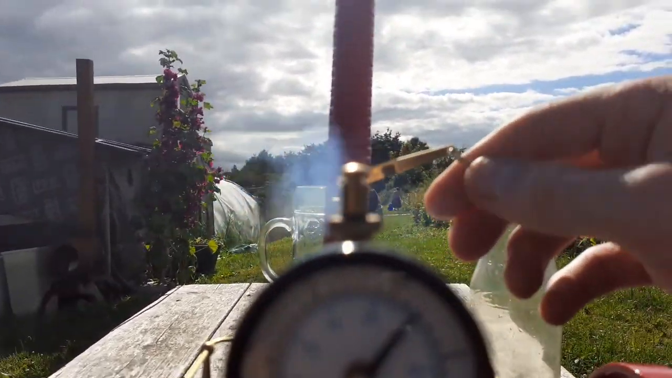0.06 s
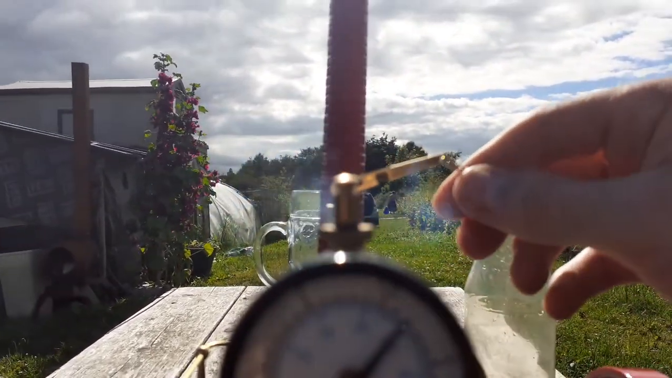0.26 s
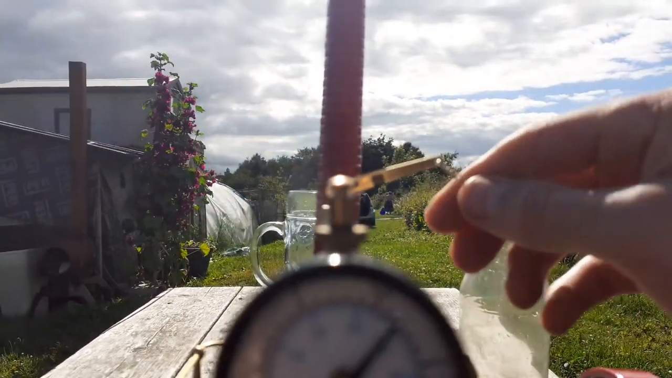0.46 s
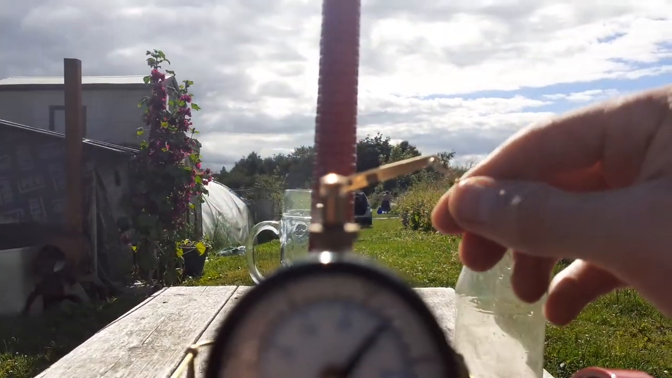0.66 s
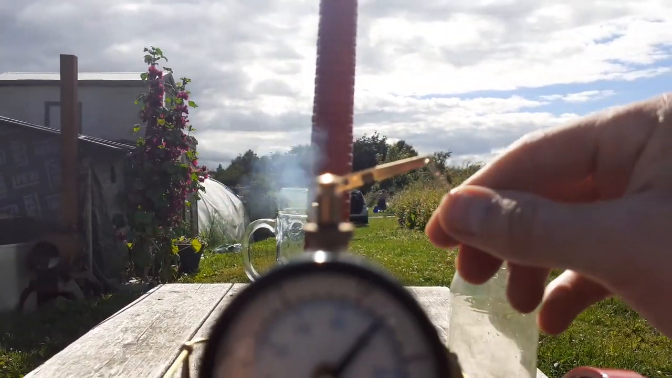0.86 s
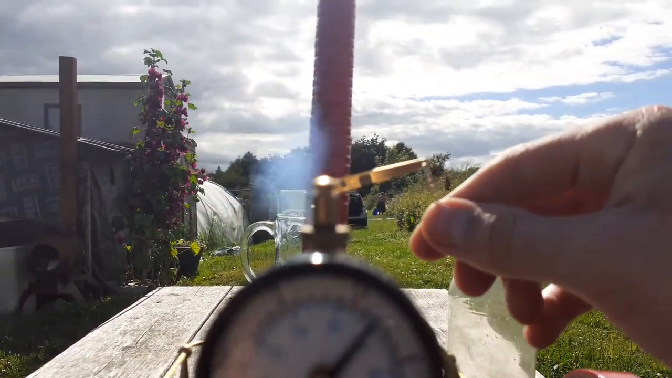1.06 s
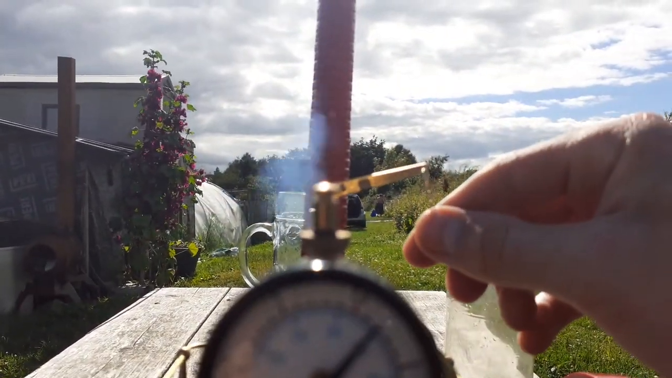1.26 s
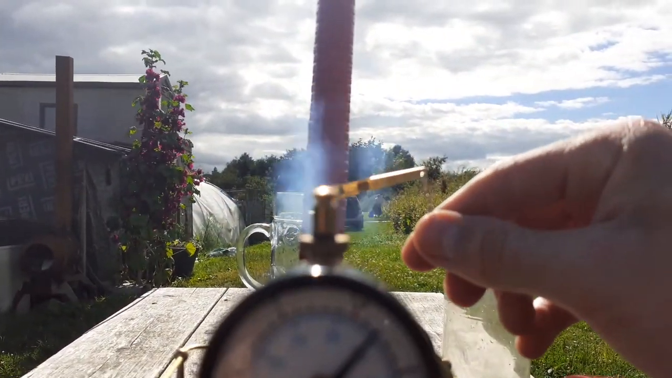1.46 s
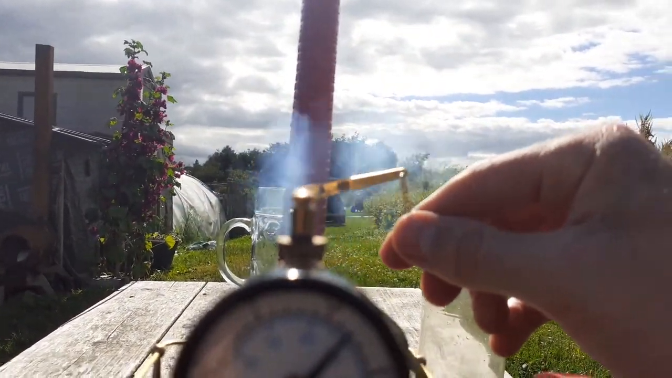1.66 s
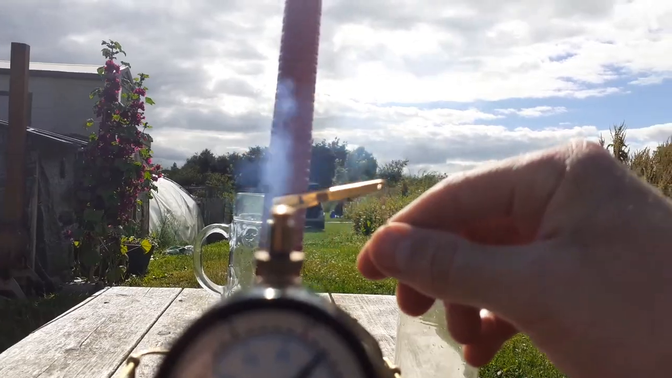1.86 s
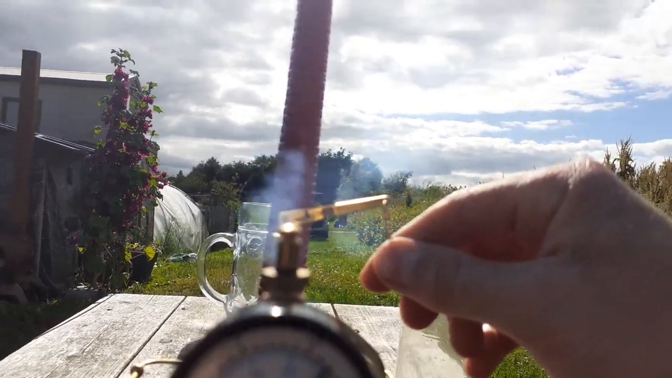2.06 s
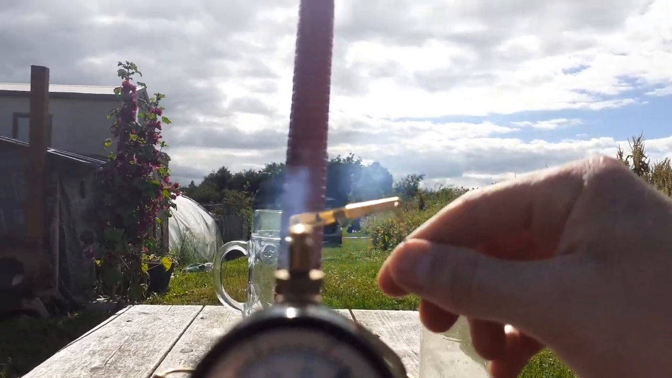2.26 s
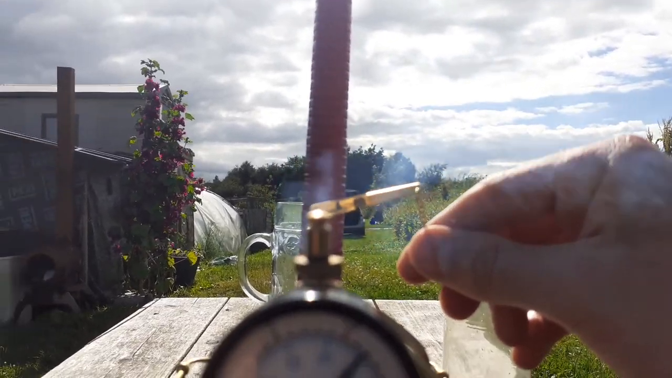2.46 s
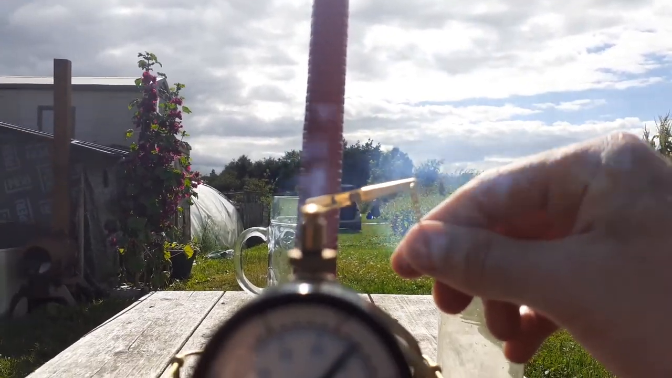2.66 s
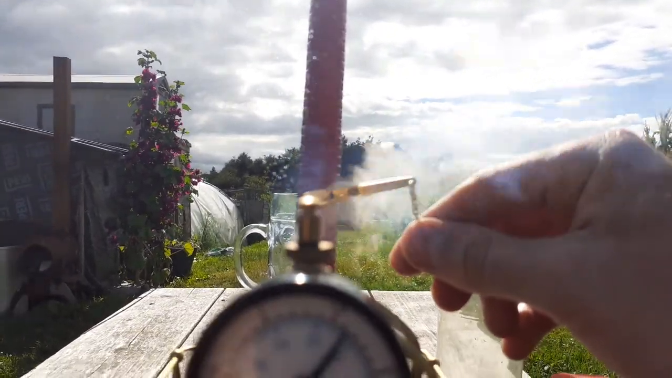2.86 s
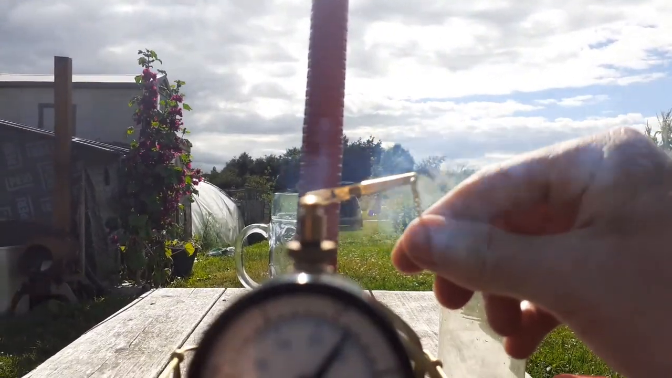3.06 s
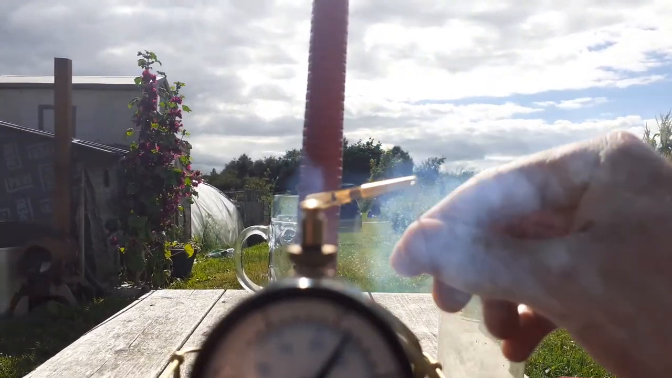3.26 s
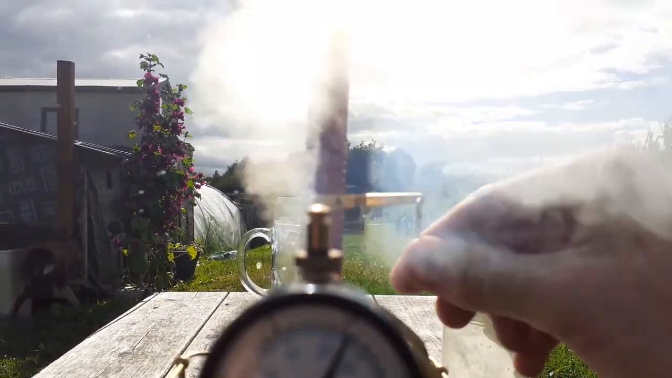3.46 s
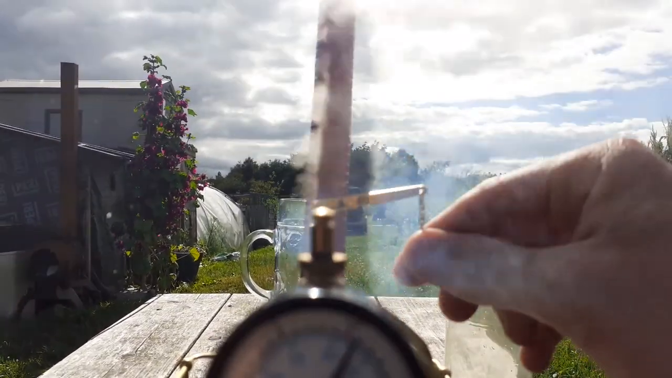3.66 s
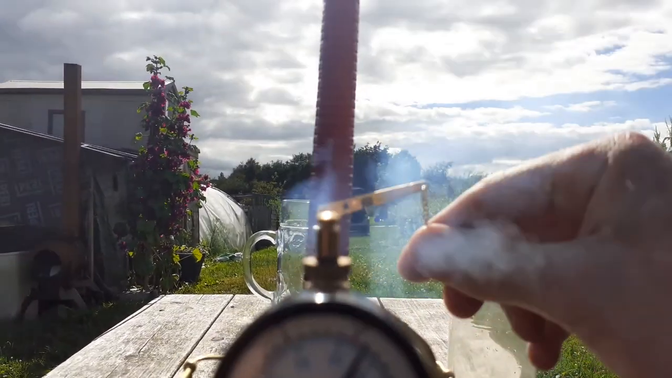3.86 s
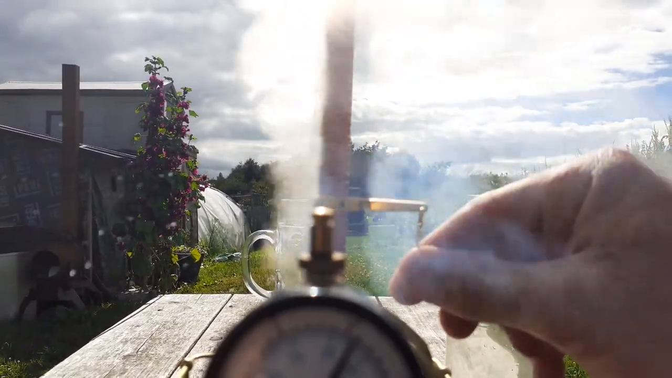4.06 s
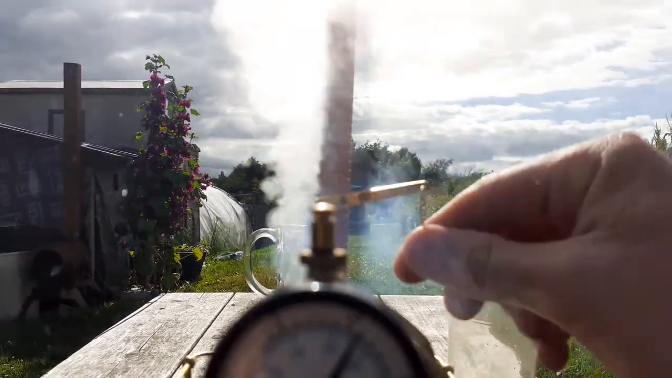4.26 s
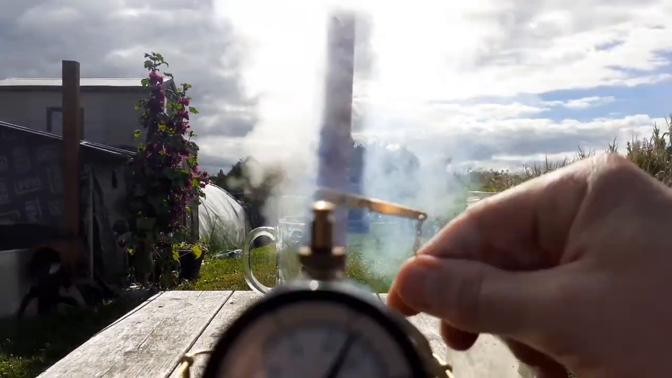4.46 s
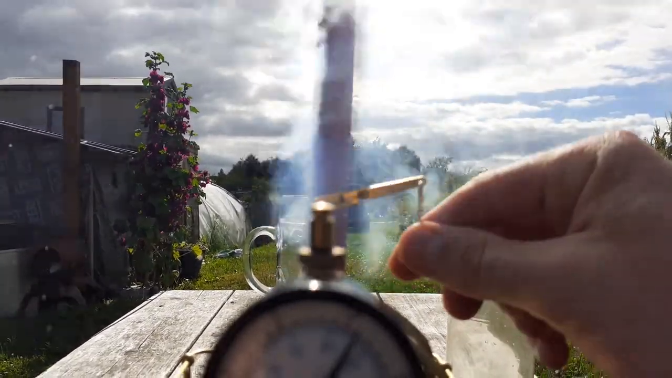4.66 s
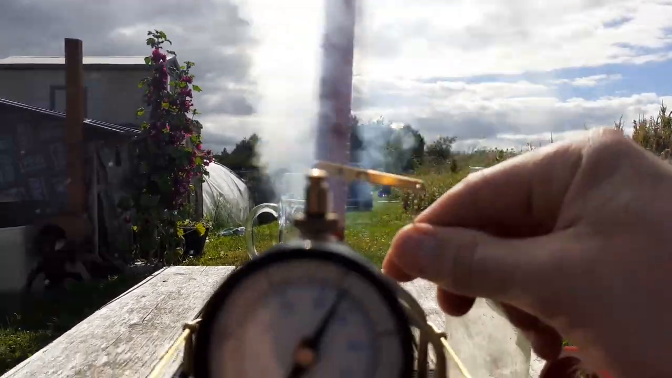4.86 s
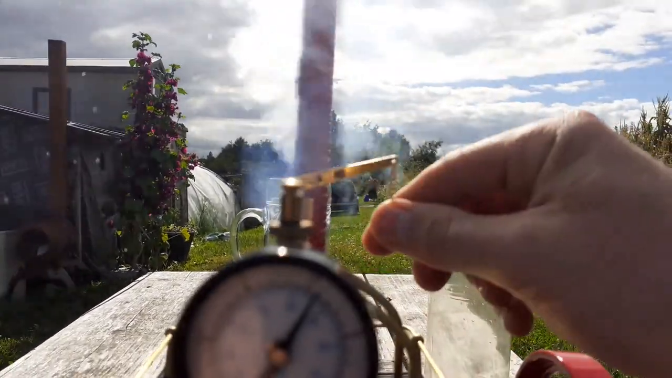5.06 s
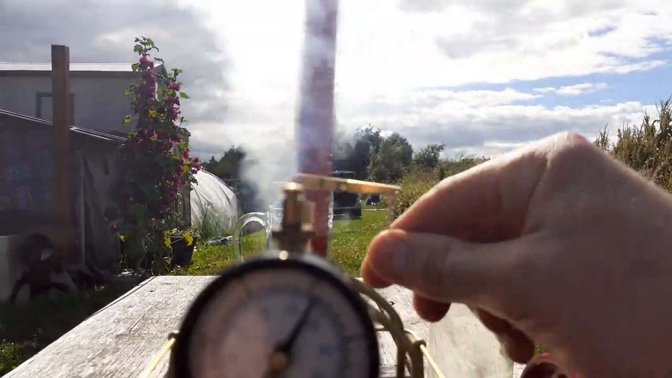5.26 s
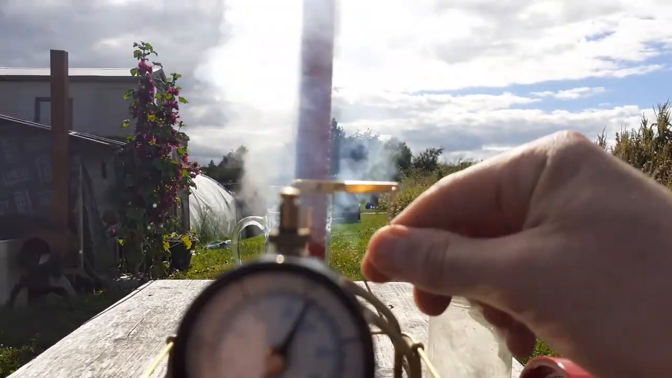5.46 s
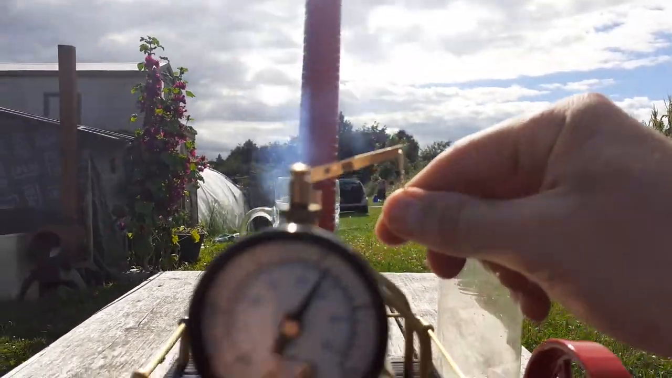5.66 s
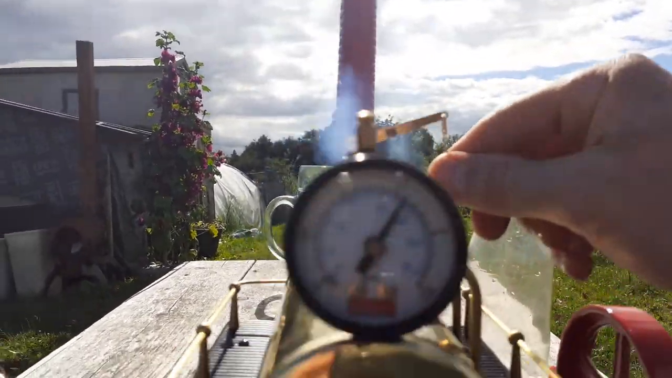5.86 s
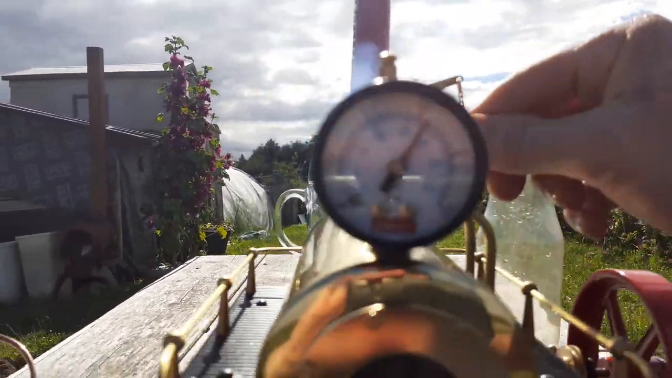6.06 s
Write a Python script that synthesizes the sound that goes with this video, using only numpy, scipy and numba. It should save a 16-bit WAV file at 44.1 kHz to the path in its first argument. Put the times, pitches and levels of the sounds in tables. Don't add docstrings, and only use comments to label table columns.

```python
import sys
import numpy as np
from scipy import signal
from scipy.fft import rfft, irfft
from scipy.io import wavfile
from scipy.ndimage import uniform_filter1d
from numba import njit

SR = 44100
rng = np.random.default_rng(int(sys.argv[2]) if len(sys.argv) > 2 else 0)


def makeup_ratio(level_db):
    decades = np.asarray(level_db, float) / 20
    return 10 ** decades


def unload_audio(sound):
    columns = np.transpose(np.atleast_2d(sound))
    steps = np.round(np.clip(columns, -1, 1) * 32767)
    wavfile.write(sys.argv[1], SR, steps.astype(np.int16))


N = 269892
T = np.arange(N) / SR
HZ = np.maximum(np.fft.rfftfreq(N, 1 / SR), 1)

# start_s, stop_s, pitch_hz, level_db, left_minus_right_db
TOOTS = [
    (3.431, 3.737, 4157, -14, 8),
    (4.035, 4.333, 4310, -12, 6),
    (4.465, 4.687, 4342, -12, 6.5),
    (4.772, 5.108, 4385, -12, 5),
    (5.263, 5.598, 4351, -15.5, 8.5),
]
# pull_ms, release_ms, level_drift_db, pitch_drift_hz, left_swing_db
LEVER = [
    (24.1, 27, -1.5, 5.5, -3),
    (22.7, 20, -0.5, -70.5, -1),
    (12.18, 12, -0.8, -26.5, 3),
    (12.12, 18, 0, 12.5, 2),
    (10.11, 13.9, -1, 8.5, 3),
]
# centre_s, bend_hz, half_length_ms
SURGES = [
    (3.445, -120, 4.2),
    (4.13, 29.5, 22),
    (4.855, 75.5, 18.3),
    (4.915, -44.5, 22),
]
# centre_s, depth_db, half_length_ms
SHADES = [
    (4.577, 5, 48),
    (4.93, 3, 45),
    (5.44, 1.5, 70),
]
# pitch_hz, second_db, third_db
OVERTONES = [(3600, -31, -33), (4000, -27, -22), (4150, -27, -18.5), (4300, -31, -23), (4450, -32, -27)]


def whistle():
    speaks_hz, dies_db = 3072, 29
    tone_law = 1.22
    start, stop, full_hz, db, pan_db = nearest(TOOTS)
    drift_db, drift_hz, swing_db = nearest(LEVER)[2:]
    weak_start_db = nearest(STEAM)[3]
    rising, falling, place = valve(1)
    rising, falling = np.minimum(rising, 1), np.minimum(falling, 1)
    drift = place - .5

    hz = full_hz + drift_hz * drift - (full_hz - speaks_hz) * (rising + falling)
    hz = hz + sum(bend * np.exp(-((T - s) * 1000 / ms) ** 2) for s, bend, ms in SURGES)
    hz = hz - 4 * choke()
    flutter_hz = 14 * walk(400) + 9 * walk(60)
    phase = 2 * np.pi * np.cumsum(hz + flutter_hz) / SR

    db = db - weak_start_db * rising ** tone_law - dies_db * falling ** tone_law
    db = db + drift_db * drift - 0.54 * dips(SHADES) - choke()
    db = db + .6 * walk(500) + .35 * walk(90)
    pan_db = pan_db + swing_db * drift - dips(SHADES)
    on = uniform_filter1d(1. * (T > start) * (T < stop), size=130)

    pitch, second_db, third_db = np.transpose(OVERTONES)
    second = makeup_ratio(np.interp(hz, pitch, second_db))
    third = makeup_ratio(np.interp(hz, pitch, third_db) + 2 * walk(170))
    out = []
    for side, lag in ((1, 0), (-1, 1.5 + .1 * walk(25))):
        p = phase - lag
        tone = np.sin(p) + second * np.sin(2 * p) + third * np.sin(3 * p)
        port_db = db + 5.5 + side * pan_db / 2 + (.7 - .3 * side) * walk(400)
        out.append(on * makeup_ratio(port_db) * tone)
    return np.array(out)


# centre_s, depth_db, half_length_ms
DROPS = [
    (3.43, 7, 6.7),
    (3.455, 10, 2.7),
    (3.507, 3, 2.1),
    (3.681, 5.5, 0.91),
    (4.606, 6, 1.8),
    (4.861, 5, 1.9),
    (4.902, 11.5, 2.7),
    (4.916, 3.5, 2.3),
    (5.343, 4, 0.93),
    (5.382, 17, 2.8),
]
# centre_s, depth_db, half_length_ms
BIG_DROP = (4.1722, 34, 5.2)


def choke():
    return dips(DROPS + [BIG_DROP])


def valve(slow):
    start, stop = nearest(TOOTS)[:2]
    pull_ms, release_ms = nearest(LEVER)[:2]

    def missing(seconds, ms):
        return np.exp(np.minimum(seconds * 1000 / (slow * ms), 4))

    place = np.clip((T - start) / (stop - start), 0, 1)
    return missing(start - T, pull_ms), missing(T - stop, release_ms), place


# jet_db, buffeting_db, drift_db, weak_start_db
STEAM = [
    (-40.5, -45.5, -1, 2.5),
    (-40, -39, -1.5, 23),
    (-40, -35, -1.5, 30),
    (-40, -39, -1.5, 29),
    (-40, -39, -0.5, 25.5),
]


def flow(col, edge_db, slow):
    rising, falling, place = valve(slow)
    steam = nearest(STEAM)
    return makeup_ratio(steam[col] + steam[2] * (place - .5) - edge_db * (rising + falling))


# time_s, jet_db, breath_above_jet_db
SPURT = [
    (2.835, -65, 11),
    (2.856, -29, 10.5),
    (2.878, -28.5, 10),
    (2.895, -33, 3.5),
    (3.04, -39, 10.5),
    (3.09, -44.5, -2),
    (3.375, -46, 4.5),
    (3.428, -30, 2),
    (3.48, -42.5, 6),
]
# freq_hz, density_db
JET = [(300, -25.5), (600, -23.5), (2000, -18), (3500, -6), (5000, -2), (5900, -10), (7500, -3),
       (9100, -17.5), (10500, -8.5), (12300, 0), (14000, -1.5), (16000, -2.5)]
# freq_hz, lead_rad
JET_LEAD = [(300, .2), (2000, .8), (4800, 1.7), (5500, 2.4), (6900, 4.8), (8300, 5.1), (11000, 6.9),
            (16000, 10.2)]
# freq_hz, left_minus_right_db
JET_BALANCE = [(400, 12), (1300, 14), (2400, 12.5), (4400, 1.5), (8100, -1.5), (12000, 7), (15000, 8)]


def jet():
    wet, slug = T < TOOTS[0][0], T < 2.885
    bore = np.sin(np.pi * valve(1)[2])
    lead, balance_db = along(JET_LEAD), along(JET_BALANCE)

    rush = flicker(ports(coloured(JET, 13660, 15040), 0.75, lead, balance_db), 0, 1.6, 60)
    top = signal.sosfiltfilt(signal.butter(4, 13200, "high", fs=SR, output="sos"), rush)
    rush = rush - np.where(wet, .55, -0.34) * top

    wet_hz = np.maximum(4600 - 1700 * (T - 2.885), 4320)
    hz = uniform_filter1d(np.select([slug, wet], [3740, wet_hz], 4490.), size=600)
    hz = hz - 28.5 * choke()
    width_hz = uniform_filter1d(np.select([slug, wet], [1400, 330], 750.), size=600)
    below_breath_edge = 1 / (1 + (HZ / 5300) ** 12)
    noise = rfft(rng.standard_normal((2, N)))
    air = irfft(below_breath_edge * ports(noise, 0.96, lead, balance_db), N)
    breath = np.array([svf(svf(a, hz, width_hz), hz, 3 * width_hz) for a in air]) / np.sqrt(width_hz)
    breath_db = np.where(wet, curve(SPURT, 2), 7.5 + 2.5 * bore)
    breath_db = breath_db + 2.0 * walk(150) + 0.07 * choke()
    breath = breath / np.std(breath) * makeup_ratio(breath_db)

    spurt = makeup_ratio(curve(SPURT, 1, -120))
    toot = flow(col=0, edge_db=8, slow=1.16) * makeup_ratio(1.5 * bore)
    return np.hypot(spurt, toot) * (rush + breath)


# freq_hz, density_db
BUFFET = [(18, -54.5), (30, -10.5), (245, -3), (334, -3), (437, -2.5), (550, -2), (642, -2.5), (3000, -7),
          (3900, -30.5), (6600, -120)]
# centre_s, depth_db, half_length_ms
LULLS = [
    (4.87, 10, 9.7),
    (4.942, 14, 19),
    (5.4, 2, 30),
]
# freq_hz, density_db
BREEZE = [(12, -64), (20, -26), (81, 5), (127, -3), (231, -15.5), (330, -16.5), (464, -38.5), (600, -17.5),
          (780, -43), (1320, -120)]
# time_s, level_db
WIND = [
    (2.16, -70),
    (2.28, -49),
    (2.39, -50.5),
    (2.446, -33.5),
    (2.576, -38),
    (2.62, -47),
    (2.77, -39),
    (3.25, -37),
    (3.55, -67.5),
]


def buffeting():
    steam = flicker(coloured(BUFFET, 230, 1800), 0, 2.2, 40) * makeup_ratio(np.array([[5], [-14]]))
    blowing = flow(col=1, edge_db=38, slow=1.9) * makeup_ratio(-dips(LULLS))
    breeze = flicker(coloured(BREEZE, 40, 200), 0, 2.1, 22.04) * makeup_ratio(np.array([[5], [11.5 - 23.5]]))
    return steam * blowing + breeze * makeup_ratio(curve(WIND, 1, -120) + 2.9 * walk(35))


# freq_hz, width_hz, level_db
SHELL = [(955, 15, -5), (1112, 27, -5), (1303, 42, 8), (1723, 54, 10), (1863, 18, -4.5), (2240, 9.9, -13.5),
         (2430, 68, -16), (2700, 38, -19.5)]
# freq_hz, density_db
CRACK = [(880, -31), (1500, -1), (2980, -7), (4760, -5), (5700, -9), (7160, -3.5), (9180, -23), (15000, -9),
         (16200, -23.5)]


def collapse(t, crack_db, ms):
    rise_ms = 1.5
    hz, width_hz, mode_db = np.array(SHELL).T[:, :, None]
    modes = makeup_ratio(mode_db) * np.exp(-np.pi * 1.6 * width_hz * t) * np.sin(2 * np.pi * hz * t)
    bins = np.fft.rfftfreq(len(t), 1 / SR) + 1
    edge = makeup_ratio(along(CRACK, bins)) * np.minimum(bins / 1500, 1) ** 2
    body = signal.butter(2, [650, 2800], "band", fs=SR, output="sos")

    shared, own, grit, spit, lumps = rng.standard_normal((5, len(t)))
    lumps = uniform_filter1d(np.repeat(lumps[:64], 64), 64)
    later = np.roll(shared, 4)
    start = makeup_ratio(4.05 * lumps) * np.minimum(t * 1000 / rise_ms, 1)
    decay = np.exp(-(t * 1000 / (rise_ms + ms)) ** 1.23)
    burst = start * decay * np.array([shared, 0.82 * later + .5 * own])

    mode_gains = makeup_ratio(4.5 * np.array([own, grit])[:, :len(hz)])
    ring = signal.fftconvolve(burst, mode_gains @ modes, axes=1)[:, :len(t)]
    thud = signal.sosfilt(body, burst)
    crack_noise = irfft(edge * rfft(np.array([grit, spit]) + own), len(t))
    crack = start * np.exp(-t * 1000 / 5.8) * crack_noise
    ring, thud, crack = (v / np.abs(v).max(axis=1, keepdims=True) for v in (ring, thud, crack))
    left = np.array([[.5], [-.5]])
    return makeup_ratio(left * 7.5) * (ring + 0.89 * thud) + makeup_ratio(crack_db - 1.0 - left * 2.5) * crack


# time_s, peak_db, crack_above_ring_db, burst_ms
KNOCKS = [(0.065, -26, 7.5, 14), (0.069, -27.5, 12, 8.9), (0.149, -17, -9, 14), (0.182, -25, -4, 22),
          (0.257, -34.5, 16, 8.6), (0.26, -20, 9, 13), (1.12, -25, -1, 11), (1.186, -22.5, 11.5, 10),
          (1.2, -23.5, 2, 14), (1.721, -26.5, -2, 5.3), (2.286, -25, -19, 11), (2.464, -31.5, -12, 66),
          (2.511, -24, 8, 14), (2.604, -21, -18, 18), (2.627, -21.5, -19, 15), (2.725, -31, 8, 8.9),
          (2.732, -22, 8.5, 12.5), (2.846, -27, 3, 25), (3.18, -35.5, -7, 23), (3.228, -34.5, -3.5, 34),
          (3.655, -32.5, 2, 11), (4.019, -47.5, 13, 14), (4.694, -39.5, 6, 9.1), (5.117, -33.5, -2, 14),
          (5.229, -35.5, 5.5, 12.3)]
# time_s, peak_db
MORE_KNOCKS = [(0.013, -34.5), (0.112, -32.5), (0.243, -32), (0.351, -35), (0.375, -34.5), (0.626, -34),
               (0.778, -36.5), (0.943, -37), (1.043, -36.5), (1.073, -36), (1.094, -35.5), (1.257, -38),
               (1.411, -38), (1.476, -38.5), (1.513, -35.5), (1.765, -33), (2.058, -34), (2.092, -38.5),
               (5.149, -34.5), (5.211, -43.5), (5.85, -49)]


def boiler():
    t = np.arange(4096) / SR
    more_knocks = [(s, db, -16, 12.6) for s, db in MORE_KNOCKS]
    chance, heard_db = rng.random((400, 2)), gain_db()
    times = np.cumsum(-np.log(chance[:, 0])) / 45
    small = [(s, -51.5 + np.interp(s, T, heard_db) + 7 * c, -30, 7)
             for s, c in zip(times, chance[:, 1]) if s < N / SR]
    out = np.zeros((2, N + len(t)))
    for s, peak_db, crack_db, ms in KNOCKS + more_knocks + small:
        i = int(s * SR)
        out[:, i:i + len(t)] += makeup_ratio(peak_db) * collapse(t, crack_db, ms)
    return signal.sosfilt(signal.butter(2, 500, "high", fs=SR, output="sos"), out[:, :N])


# freq_hz, density_db
LEAK = [(300, -39), (500, -9), (660, -3), (1260, -5.5), (2060, -3), (3500, -1), (5000, -4.5), (6200, -8),
        (7550, -1.5), (9000, -12.5), (11500, -2), (14300, 1), (15800, -1)]
# freq_hz, share_0_to_1
LEAK_LIKENESS = [(60, .85), (300, 1), (700, 0.5), (2000, 1), (6000, 0.17), (9000, 0.3), (16000, 0.4)]
# freq_hz, lead_rad
LEAK_LEAD = [(300, .1), (1400, .7), (2100, 2), (3500, 3), (9000, 3.3), (11000, 5), (16000, 7.5)]
# freq_hz, left_minus_right_db
LEAK_BALANCE = [(60, 5), (110, 6), (200, 7), (380, 2), (700, 1), (1290, 10.5), (2380, 10.5), (4400, 7.5),
                (8120, 2.5), (15000, 7)]
# time_s, level_db
LEAK_LEVEL = [
    (0, -43.5),
    (.8, -45.5),
    (2.0, -43),
    (2.8, -43.5),
    (6.12, -44.5),
]


def leak():
    hiss = ports(coloured(LEAK, 11940, 16050), along(LEAK_LIKENESS), along(LEAK_LEAD), along(LEAK_BALANCE))
    hiss = flicker(hiss, .4, 1.0, 6)
    seat_hz = np.clip(14900 + 350 * walk(2.5), 11000, 16000)
    seat_width_hz = np.full(N, 1300.)
    seat = np.array([svf(h, seat_hz, seat_width_hz) for h in hiss])
    return makeup_ratio(curve(LEAK_LEVEL, 1)) * (hiss + .5 * seat)


# freq_hz, density_db
FAR = [(20, -39), (40, -14), (62, -6.5), (100, -9.5), (170, -10), (230, -6.5), (400, -8), (600, -19),
       (900, -40.5)]
# time_s, level_db
FAR_SWELL = [
    (0, -60.5),
    (1.2, -61),
    (3.4, -55.5),
    (3.9, -59),
    (4.6, -61),
    (6.12, -58.5),
]
# time_s, pitch_hz, level_db
HUM = [
    (0, 432, -58),
    (.3, 418.7, -55.5),
    (.6, 410, -72),
    (1.5, 412, -68),
    (2.9, 426, -62.5),
    (3.75, 431.7, -68.5),
    (6.12, 445.5, -59.5),
]


def garden():
    far = ports(coloured(FAR, 40, 440), along(LEAK_LIKENESS), 0, along(LEAK_BALANCE))
    rumble = makeup_ratio(curve(FAR_SWELL, 1)) * flicker(far, 0.66, 0.75, 11.0)
    phase = 2 * np.pi * np.cumsum(curve(HUM, 1) + 0.63 * walk(21)) / SR
    hum = makeup_ratio(curve(HUM, 2) + 3.0 + 2.0 * walk(3)) * (np.sin(phase) + 0.59 * np.sin(phase / 2))
    return rumble + hum


def gain_db():
    after_s = T - 3.52
    return -14.5 * np.clip(after_s / 0.18, 0, 1) - 0.8 * np.maximum(after_s, 0)


def curve(rows, col, off=None):
    rows = np.asarray(rows, float)
    return np.interp(T, rows[:, 0], rows[:, col], off, off)


def along(points, hz=HZ):
    points = np.asarray(points, float)
    return np.interp(np.log(hz), np.log(np.maximum(points[:, 0], 1)), points[:, 1])


def nearest(rows):
    start, stop = np.transpose(TOOTS)[:2]
    toot = np.searchsorted((stop[:-1] + start[1:]) / 2, T)
    return np.asarray(rows, float)[toot].T


def dips(rows):
    return sum(db * np.exp(-((T - s) / (ms / 1000)) ** 4) for s, db, ms in rows)


def walk(rate):
    k = int(SR / rate)
    held = np.repeat(rng.standard_normal(N // k + 1), k)
    return 1.5 * uniform_filter1d(uniform_filter1d(held, k), k)[:N]


def coloured(spectrum, lo_hz, hi_hz):
    gain = makeup_ratio(along(spectrum))
    inside = (HZ > lo_hz) & (HZ < hi_hz)
    gain = gain / np.sqrt(np.sum(gain[inside] ** 2) / len(HZ))
    return gain * rfft(rng.standard_normal((2, N)))


def ports(pair, like, lead, balance_db):
    like = np.clip(like, 0, 1)
    right = like * pair[0] * np.exp(-1j * lead) + np.sqrt(1 - like ** 2) * pair[1]
    top = 2 / np.sqrt(1 + makeup_ratio(-2 * balance_db))
    return np.array([top * pair[0], top * makeup_ratio(-balance_db) * right])


def flicker(spectra, swell_db, quick_db, rate):
    out, swell = 0, walk(0.63)
    for k in range(5, 15):
        band = np.clip(1 - np.abs(np.log2(HZ) - k), 0, 1)
        out = out + makeup_ratio(swell_db * swell + quick_db * walk(rate)) * irfft(band * spectra, N)
    return out


@njit
def svf(x, hz, width):
    y, band, low = np.empty(len(x)), 0., 0.
    for i in range(len(x)):
        g, k = np.tan(np.pi * hz[i] / SR), width[i] / hz[i]
        v = (band + g * (x[i] - low)) / (1 + g * (g + k))
        band, low, y[i] = 2 * v - band, low + 2 * g * v, k * v
    return y


def scene():
    close = whistle() + jet() + buffeting() + boiler()
    return close + makeup_ratio(gain_db()) * (leak() + garden())


def top_cut(x):
    return signal.sosfilt(signal.butter(12, 17090, fs=SR, output="sos"), x)


def record(dry):
    top = signal.ellip(12, .3, 62, 15780, fs=SR, output="sos")
    x = signal.sosfilt(top, np.tanh(0.61 * dry) / .6)

    def band(lo_hz, hi_hz):
        return signal.sosfiltfilt(signal.butter(6, (lo_hz, hi_hz), "band", fs=SR, output="sos"), x)

    tone, faint = band(3900, 4600), band(5300, 6350)
    tone_power, faint_power = (uniform_filter1d(np.sum(v ** 2, axis=0), size=1024) for v in (tone, faint))
    masked = faint_power < tone_power * makeup_ratio(2 * -33.5)
    dropped = uniform_filter1d(1. * masked, size=300)
    return top_cut(x - dropped * faint)


dry = scene()
out = record(dry)
unload_audio(out)
```